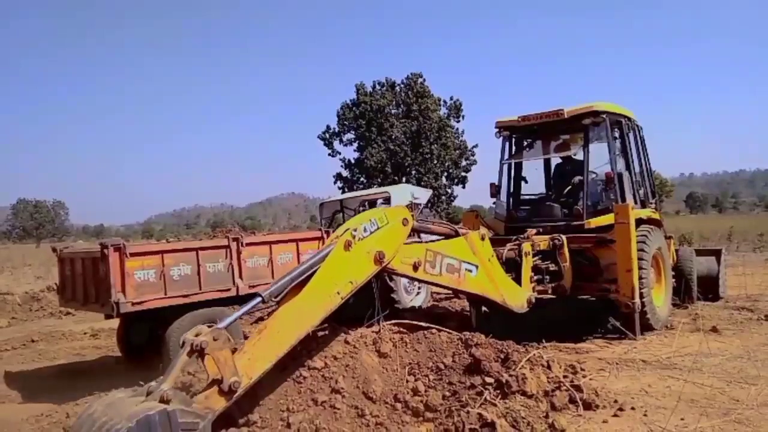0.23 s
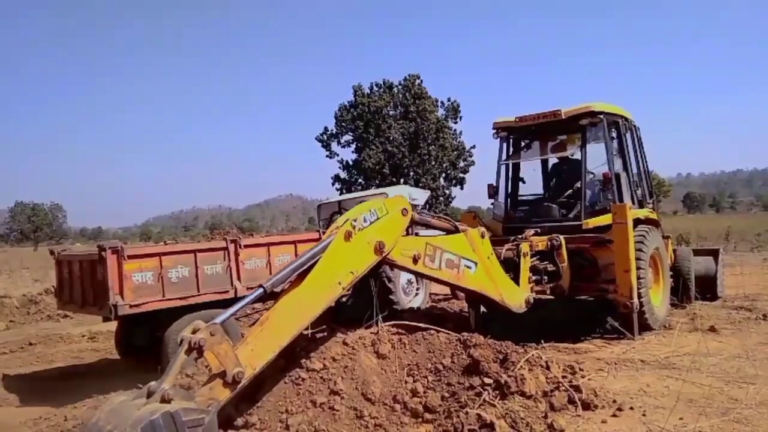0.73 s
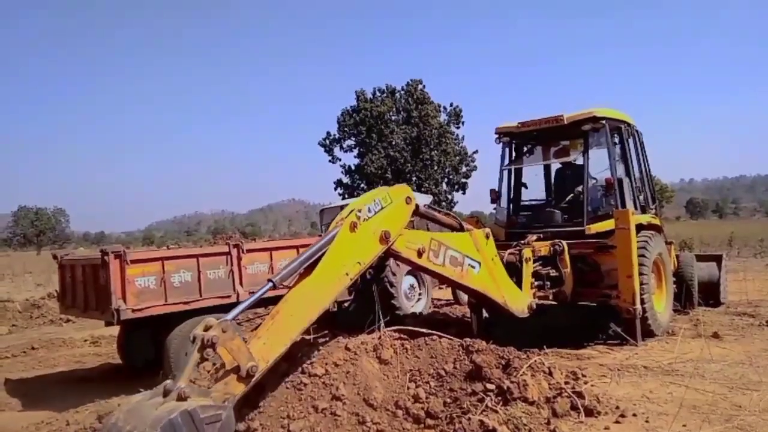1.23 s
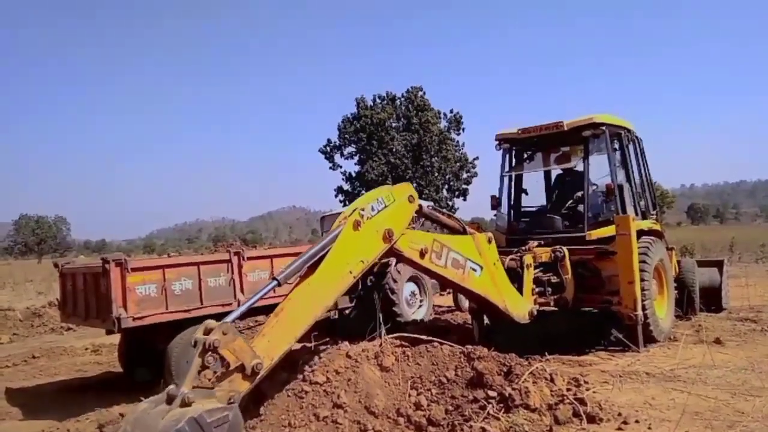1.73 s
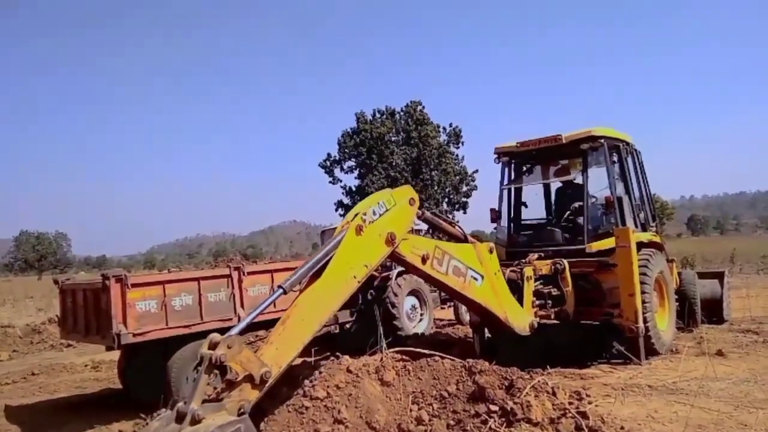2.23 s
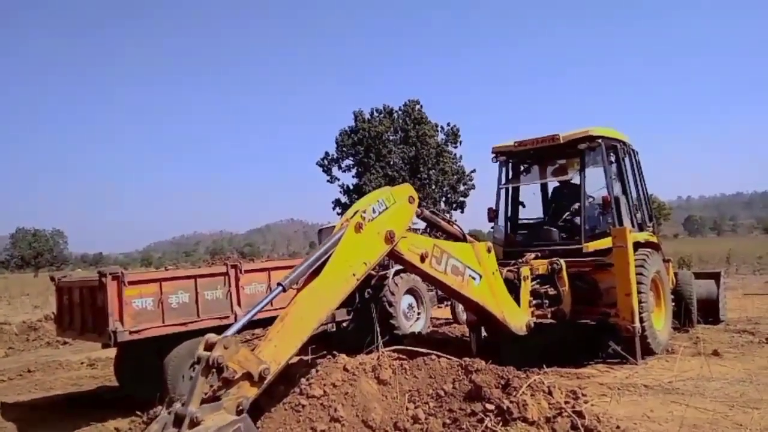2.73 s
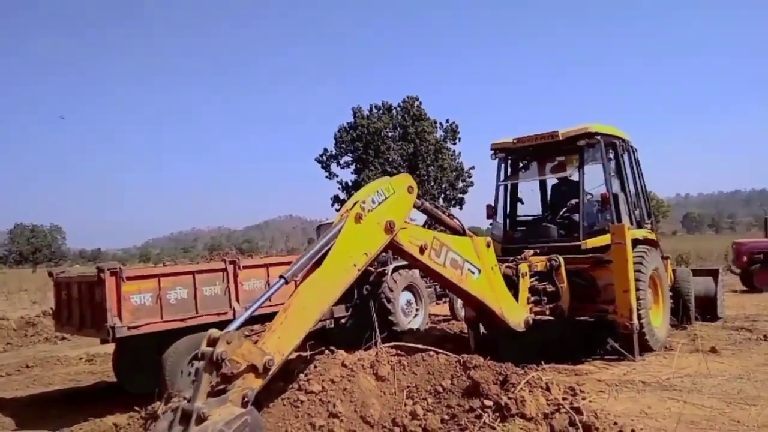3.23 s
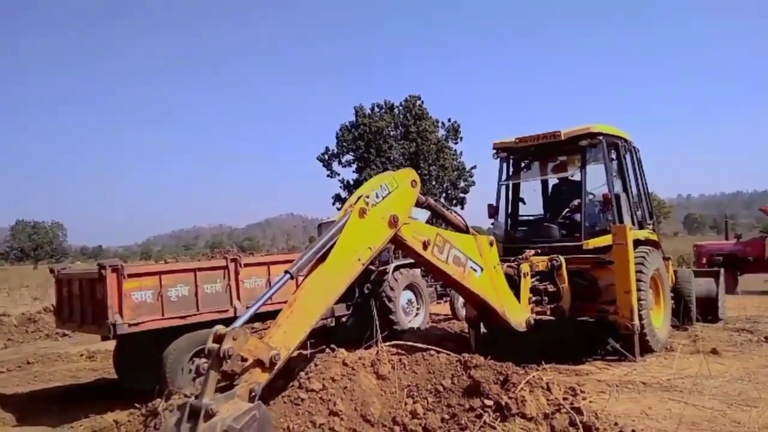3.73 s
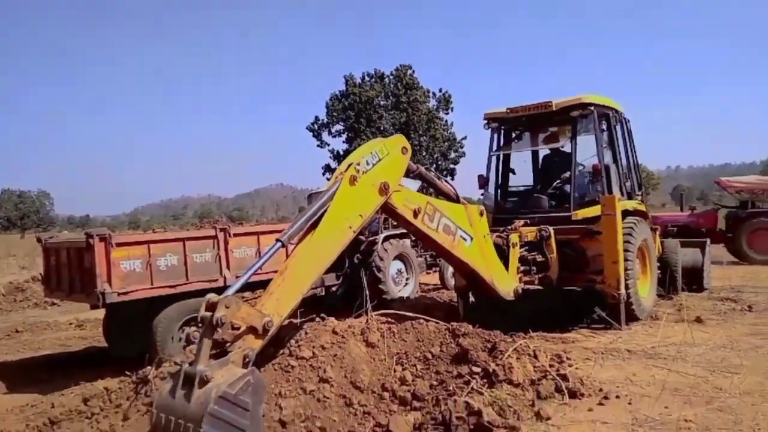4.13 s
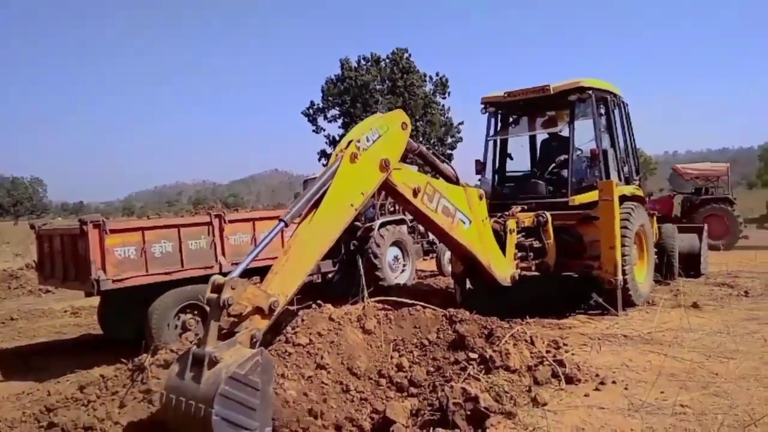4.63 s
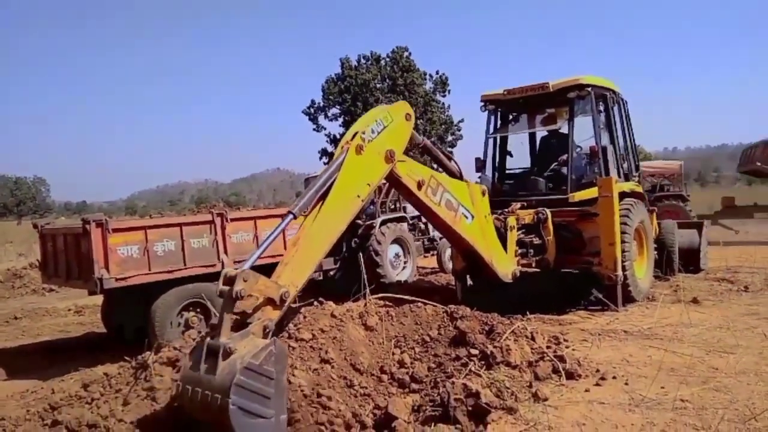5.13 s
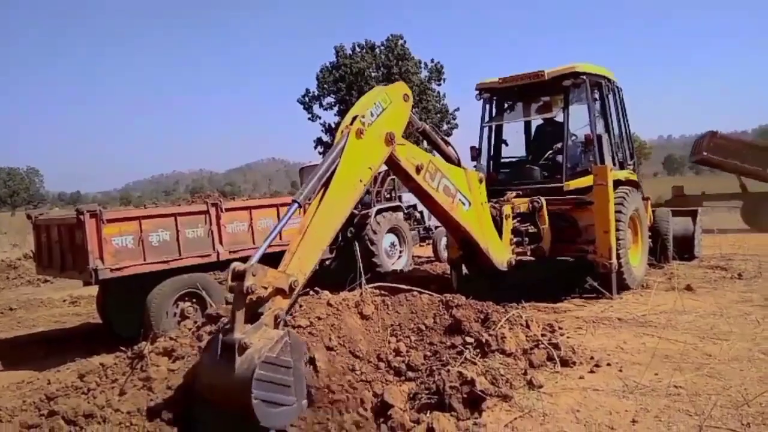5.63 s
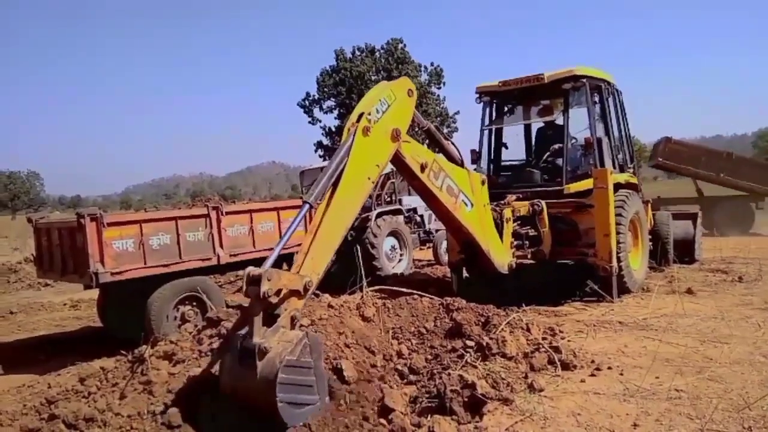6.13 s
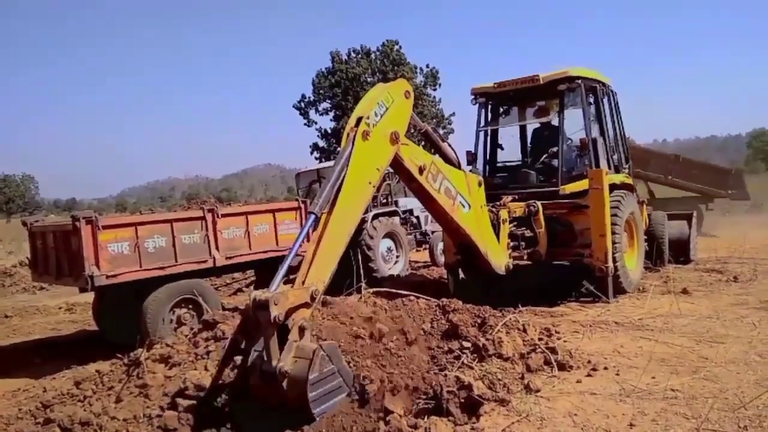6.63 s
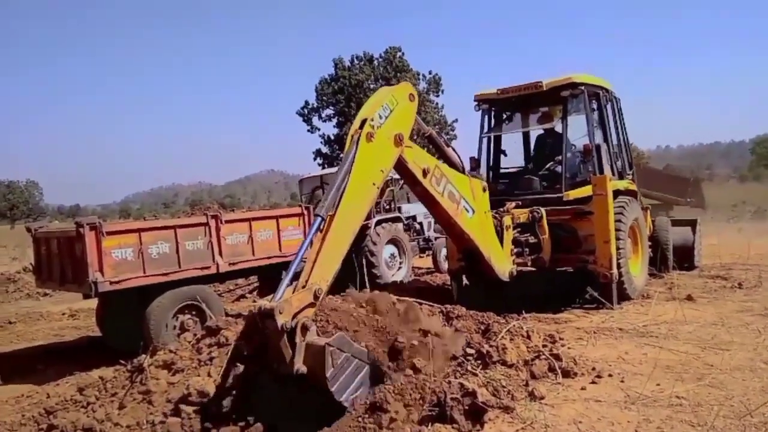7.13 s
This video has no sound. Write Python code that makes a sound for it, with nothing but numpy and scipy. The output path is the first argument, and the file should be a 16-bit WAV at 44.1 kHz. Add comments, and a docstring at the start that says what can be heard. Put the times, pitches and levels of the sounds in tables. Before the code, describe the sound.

A digger's diesel engine throbs steadily as earth grinds and tumbles against its steel bucket, with sharp knocks and dull thuds.

```python
"""A diesel backhoe loader drags its bucket through dry soil in an open field.
Its firings chug in the exhaust and rattle the casing. Earth grinds, slides and thuds; clods and
stones strike the steel bucket, which groans with friction. The linkage clanks, a dry pin squeaks,
the pump hums and oil hisses in the valves. A tractor drones behind. The sound is on the left."""
import sys
import numpy as np
from scipy import signal
from scipy.fft import rfft, irfft, next_fast_len
from scipy.io import wavfile
from scipy.ndimage import uniform_filter1d, map_coordinates

SR = 44100
rng = np.random.default_rng(int(sys.argv[2]) if len(sys.argv) > 2 else 0)


def wav_record(signal):
    """Record a signal, one row per channel, as 16-bit PCM in the file named by sys.argv[1]."""
    frames = np.transpose(np.atleast_2d(signal))
    bounded = np.clip(frames, -1, 1)
    # unit amplitude maps onto the largest positive 16-bit level
    quanta = np.round(bounded * 32767).astype(np.int16)
    wavfile.write(sys.argv[1], SR, quanta)


N = 325017
TIME = np.arange(N) / SR
LN_1000 = np.log(1000)  # 60 dB of decay

# bucket bites, fills, lifts clear: (time [s], scrape level [dB], tumble level [dB])
DIG_LEVELS = [(.25, -56.5, -48), (1.3, -56.5, -84), (1.75, -48, -77), (1.83, -42, -48), (2.05, -42, -39),
              (2.33, -49.5, -43), (2.6, -49, -54), (3.3, -55.5, -48.5), (4.4, -56.5, -51.5),
              (5.5, -70.5, -56.5), (6.0, -62.5, -55), (7.37, -83.5, -59.5)]
# hollow steel bucket: (frequency [Hz], base t60 [s])
BUCKET_MODES = [(385, 0.096), (440, 0.096), (508, 0.17), (545, 0.076), (582, 0.027), (615, 0.15),
                (743, 0.17), (852, 0.0083), (905, 0.069), (982, 0.12)]
# frame and ground: (frequency [Hz], relative density [dB])
GROUND_SPECTRUM = [(20, -21.5), (38, 7), (80, 3.5), (120, 12.5), (190, 0), (290, -1), (380, -10),
                   (480, -50), (700, -32.5), (1500, -62.5)]


def exhaust(firings, load_db):
    """Each firing pushes and pulls exhaust gas, a little unevenly; overtones grow with load."""
    # (multiple of firing rate, relative level [dB])
    overtones = [(2, 6.5), (3, 1)]
    bark = sum(undb(db + 1.8 * walk(14)) * np.sin(2 * np.pi * k * firings) for k, db in overtones)
    tone = np.sin(2 * np.pi * firings) * undb(1.8 * walk(25))
    tone_db = -34.5 + .45 * (load_db - np.median(load_db))
    chug = undb(1.7 * walk(32))
    return -chug * (unit(tone) * undb(tone_db) + unit(bark) * undb(load_db + 8.5))


def clatter(firings, bite_db):
    """Combustion and gears rattle the casing once a firing, harder when the bucket bites."""
    # casing: (frequency [Hz], nominal width [Hz], relative level [dB])
    modes = [(530, 23, -3.5), (744, 66, -8), (880, 34, -19.5), (1209, 176, 6.5), (1800, 243, 2),
             (2543, 200, -3.5), (2728, 200, -4.5), (2960, 170, -6.5), (3170, 100, -12), (3720, 54, -13),
             (4294, 220, -19.5)]
    decay_cycles = .38
    stroke = undb(7 * rng.standard_normal(int(firings[-1]) + 1))[firings.astype(int)]
    gate = 2 + stroke * np.exp(-(firings % 1) / decay_cycles)
    casing = lambda f: sum(undb(db) / (1 + 2j * (f - hz) / (.58 * width)) ** 2 for hz, width, db in modes)
    ring = shape(noise() * gate, casing)
    ring = np.interp(TIME + .00018 * walk(22), TIME, ring)  # slight pitch waver
    force_db = -53 + .4433 * (bite_db - np.median(bite_db))
    return patchy(ring, spread_db=4, rate_hz=15, width_hz=126.15) * undb(force_db + walk(19))


def digging():
    """Scrape, tumble and shudder levels in dB: the steady bite, swollen as earth slides off the bucket."""
    # (peak time [s], level [dB], t60 [s])
    slides = [(.86, -52.5, 1.1), (2.209, -44, 0.27), (3.0, -35.5, 0.63), (6.7, -49.5, 1.1)]
    rise_s = .13
    scrape_db, tumble_db = curves(DIG_LEVELS)
    slide = sum(undb(db) * blow(s - rise_s, rise_s, t60) for s, db, t60 in slides)
    swell = lambda steady_db, share_db: 20 * np.log10(np.hypot(undb(steady_db), undb(share_db) * slide))
    return swell(scrape_db, 0), swell(tumble_db, -4.5), swell(steady_db=-36.5, share_db=14.5)


def soil(scrape_db):
    """Crumbs grind along the steel in uneven slips; a light touch only whispers."""
    # (frequency [Hz], relative density [dB])
    spectrum = [(350, -3), (600, 3), (800, -18.5), (1050, -22.5), (1300, 1.5), (1520, 1), (1850, 1),
                (3000, 0.5), (3900, -12), (5000, -25.5), (6800, -22.5), (9000, -38.5), (15000, -45.5)]
    grind = colour(grains(per_s=3000, spread_db=3.5) + .9 * noise(), spectrum)
    whisper_db = 2.2 * np.minimum(scrape_db + 54, 0)
    slip_db = 1.5 * walk(48)
    grind = patchy(grind, spread_db=7, rate_hz=28, width_hz=185.8)
    return grind * undb(scrape_db + whisper_db + slip_db)


def knocks():
    """Linkage knocks and cracking stones: a snap, then a shower of cracks and a spray of grit."""
    # (time [s], relative crack level [dB], relative grit level [dB], shower t60 [s])
    hits = [(0.515, -44, -50.5, 0.31), (0.806, -51, -54, 0.19), (1.526, -40, -54, 0.81),
            (1.89, -28, -46.5, 1), (2.152, -25.5, -39, 0.25), (2.343, -40.5, -65, 0.24),
            (2.408, -34.5, -51.5, 0.26), (2.461, -33.5, -54.5, 0.34), (2.521, -29.5, -44, 0.12),
            (2.659, -38.5, -41, 0.23), (2.81, -37, -44.5, 0.27), (2.914, -32, -70, 0.39),
            (3.045, -30.5, -56, 0.45), (3.262, -33, -80, 0.4), (3.277, -38, -71, 0.77),
            (3.549, -38, -56.5, 0.61), (3.651, -37, -45, 0.19), (3.674, -37, -56, 0.45),
            (4.05, -40.5, -57.5, 0.35), (4.114, -32, -44, 0.33), (4.426, -38.5, -69, 0.4),
            (5.077, -40.5, -80, 0.19), (5.112, -36.5, -88, 0.28), (6.4553, -31.5, -70, 0.37),
            (6.552, -42, -94, 0.6), (6.634, -38.5, -43.5, 0.27), (6.702, -47, -51, 0.067)]
    # both: (frequency [Hz], relative density [dB])
    crack_spectrum = [(200, -11.5), (500, 20), (750, 10), (1300, 17), (2700, 14.5), (3300, 6), (3900, -22),
                      (4800, -40), (9000, -68.5)]
    grit_spectrum = [(2500, -18), (4000, 9), (5200, -5.5), (7000, -3), (9000, -11.5), (11500, -10),
                     (15000, -22.5)]
    snap = sum(undb(db - 6) * blow(s, .003, .07) for s, db, _, _ in hits)
    shower = sum(undb(db - 8) * blow(s, .009, t60) for s, db, _, t60 in hits)
    spray = sum(undb(db - 4.5) * blow(s - .002, .0082, .96 * t60) for s, _, db, t60 in hits)
    stone = colour(grains(per_s=3500, spread_db=2), crack_spectrum)
    stone = patchy(stone, spread_db=3, rate_hz=12, width_hz=110)
    grit = colour(grains(per_s=2200, spread_db=1), grit_spectrum)
    grit = patchy(grit, spread_db=5, rate_hz=14, width_hz=160)
    return (snap + shower) * stone + spray * grit


def clods():
    """Clods ring the bucket modes near their own pitch; harder ones ring higher and crunch less."""
    # (time [s], relative level [dB], favoured frequency [Hz])
    large = [(.503, -45, 575), (.638, -35, 568), (1.406, -45, 620), (1.84, -39, 660), (1.885, -32.5, 600),
             (2.157, -28, 818), (2.53, -36.5, 770), (2.659, -34.5, 472), (2.84, -35.5, 532),
             (3.06, -29, 463), (3.273, -40, 665), (3.322, -41.5, 890), (3.662, -39, 395), (4.11, -36, 560),
             (4.343, -39, 423), (4.93, -45.5, 537), (5.114, -38.5, 553), (6.457, -44, 940),
             (6.554, -40.5, 564), (6.624, -41.5, 510), (7.197, -42, 540)]
    # (frequency [Hz], relative density [dB])
    crunch_spectrum = [(150, -21.5), (350, 26), (680, -3), (900, -19.5), (1600, -31.5)]
    small_hz, crunch_db_per_octave = 530, -17
    moments = scatter(start_s=2.1, per_s=5.1)  # small clods drop once the bucket is full
    small = [(s, -57 + 1.4 * size, small_hz * 2 ** (.3 * pitch)) for s, size, pitch in moments]
    drops = list(large) + small
    hz, t60 = np.transpose(BUCKET_MODES)[:, :, None]
    t = TIME[:SR // 4]
    decay = np.exp(-LN_1000 * t / (1.65 * t60))
    attack = 1 - np.exp(-t / .0035)
    flutter = 1 + .45 * walk(260)  # loose earth on the ringing steel
    rings, crunch = np.zeros(N + len(t)), np.zeros(N)
    for (s, db, centre_hz), phase in zip(drops, rng.random((len(drops), len(hz), 1))):
        first = int(s * SR)
        weight = favour(hz, centre_hz, span_octaves=.085)
        loaded_hz = hz * (1 + .015 * rng.standard_normal())  # shifting load retunes the bucket
        ring = np.sum(weight * decay * np.sin(2 * np.pi * (loaded_hz * t + phase)), axis=0)
        ring *= attack * flutter[first // 2:][:len(t)]
        rings[first:first + len(t)] += undb(db + 6) * ring / np.abs(ring).max()
        crunch_db = db - 8 + crunch_db_per_octave * np.log2(centre_hz / small_hz)
        crunch += undb(crunch_db) * blow(s, .005, .6)
    return rings[:N] + crunch * colour(noise(), crunch_spectrum)


def thuds():
    """Heavy lumps shake the ground for a few cycles and break up."""
    # (time [s], relative level [dB], frequency [Hz])
    lumps = [(0.534, -24.5, 146), (0.857, -22, 140), (.917, -23.5, 170), (1.652, -27, 191),
             (1.914, -21, 117), (2.238, -25, 200), (2.684, -23.5, 103), (2.938, -16, 109),
             (2.977, -21, 157), (3.019, -18, 206), (3.263, -21.5, 116)]
    swing = sum(undb(db + 6.5) * blow(s, .0038, .042) * np.sin(2 * np.pi * hz * (TIME - s))
                for s, db, hz in lumps)
    crumble = sum(undb(db - 2) * blow(s, .018, .19) for s, db, _ in lumps)
    return swing + crumble * colour(noise(), GROUND_SPECTRUM)


def rumble(firings, shudder_db):
    """Frame and ground shudder, throbbing with each crank turn and each firing."""
    throb = 1 + .29 * np.cos(np.pi * firings) + .5 * np.cos(2 * np.pi * firings)
    return colour(noise() * throb, GROUND_SPECTRUM) * undb(shudder_db)


def clanks():
    """Steel strikes steel or stone; the faces chatter and ring the linkage modes around one pitch."""
    # arm and linkage: (frequency [Hz], t60 [s])
    modes = [(1244, 0.16), (1650, 0.26), (1815, 0.31), (2245, 0.092), (2495, 0.086), (2720, 0.041),
             (3101, 0.056), (3278, 0.12)]
    # (time [s], relative level [dB], favoured frequency [Hz])
    hits = [(1.807, -29.5, 1720), (1.884, -23.5, 3200), (2.159, -21.5, 2760), (2.519, -23, 2600),
            (2.527, -41, 1250), (4.117, -38, 2300), (4.137, -35.5, 1540), (5.078, -36.5, 1850)]
    chatter_s, dull_hz = .0045, 3600  # earth between the faces dulls the blow
    hz, t60 = np.transpose(modes)[:, :, None]
    t = TIME[:SR // 3]
    decay = np.exp(-LN_1000 * t / t60)
    out = np.zeros(N + len(t))
    for s, db, centre_hz in hits:
        first = int(s * SR)
        weight = favour(hz, centre_hz, span_octaves=.2)
        detune = 1 + .008 * rng.standard_normal(hz.shape)
        response = np.sum(weight * decay * np.sin(2 * np.pi * hz * detune * t), axis=0)
        chatter = rng.standard_normal(len(t)) * t * np.exp(-t / chatter_s)
        ring = signal.fftconvolve(response, chatter)[:len(t)]
        out[first:first + len(t)] += undb(db - 2) * ring / np.abs(ring).max()
    return signal.sosfilt(signal.butter(6, dull_hz, fs=SR, output="sos"), out[:N])


def groans():
    """Friction makes the dragged bucket sing: a rough tone that swells, glides and fades."""
    # (time [s], length [s], level [dB], start frequency [Hz], end frequency [Hz])
    glides = [(0.218, 0.22, -49, 590, 705), (0.504, 0.074, -41.5, 544, 680), (0.616, 0.12, -35, 311, 306),
              (0.649, 0.12, -48.5, 575, 600), (1.644, 0.1, -46.5, 714, 744), (1.831, 0.08, -37.5, 305, 268),
              (1.926, 0.143, -42.5, 1340, 1270), (2.161, .08, -38, 703, 868), (2.527, 0.051, -32, 811, 759),
              (3.844, 0.051, -40, 502, 554), (3.872, 0.041, -45.5, 886, 938), (4.13, 0.092, -39, 555, 510),
              (4.345, 0.089, -39.5, 471.5, 579), (4.847, 0.079, -53.5, 883, 930)]
    roughness, flutter_hz = .55, 110
    flutter = 1 + roughness * (walk(flutter_hz) + 1j * walk(flutter_hz))
    out = np.zeros(N)
    for s, length_s, db, start_hz, end_hz in glides:
        span = slice(int(s * SR), int((s + length_s) * SR))
        along = np.linspace(0, 1, len(out[span]))
        cycles = np.cumsum(start_hz + (end_hz - start_hz) * along) / SR
        swell = np.sqrt(np.abs(np.sin(np.pi * along)))
        out[span] += undb(db) * swell * np.imag(flutter[span] * np.exp(2j * np.pi * cycles))
    return out


def tumbling(tumble_db):
    """Small clods keep tumbling in the bucket and make its lower modes mutter."""
    # (frequency [Hz], relative gain [dB])
    tilt = [(200, -31), (370, 4.5), (600, 1), (720, -17.5), (950, -2.5), (1400, -40)]
    taps = grains(per_s=400, spread_db=0) * undb(2 * walk(20))
    bucket = lambda f: sum(1 / (1 + 2j * np.pi * (f - hz) * t60 / LN_1000) for hz, t60 in BUCKET_MODES)
    ring = colour(shape(taps, bucket), tilt)
    return patchy(ring, spread_db=8, rate_hz=17, width_hz=100) * undb(tumble_db)


def pump(firings):
    """The hydraulic pump, geared to the crank, hums at six times the firing rate."""
    hum = np.sin(2 * np.pi * 6 * firings + .3 * walk(45)) * undb(3 * walk(7.7))
    return unit(hum) * undb(-47.5)


def oil_flow(scrape_db):
    """Oil level in dB: each valve opens, holds and shuts, over a leak that follows the scrape."""
    # (time [s], hold [s], level [dB])
    openings = [(0.97, 0.4, -68.5), (1.9, 0.12, -56), (2.82, 0.18, -59), (3.639, 0.25, -60.5),
                (4.35, 0.13, -62.5), (4.981, 0.13, -67.5)]
    open_db_per_s, shut_db_per_s, leak_db = 318, 237, -19
    flow = undb(scrape_db + leak_db)
    for s, hold_s, db in openings:
        opening_db = np.maximum(s - TIME, 0) * open_db_per_s
        shutting_db = np.maximum(TIME - s - hold_s, 0) * shut_db_per_s
        flow = np.hypot(flow, undb(db - opening_db - shutting_db))
    return 20 * np.log10(flow)


def valves(flow_db):
    """Throttled oil hisses and flutters; the harder it is forced, the higher the hiss."""
    # both: (frequency [Hz], relative density [dB])
    hiss_spectrum = [(4000, -39), (5500, -15.5), (7000, 0), (8500, -10), (10600, 5), (12500, -4),
                     (14200, -6.5), (15500, -13)]
    jet_spectrum = [(7000, -36.5), (11000, 2), (13000, 12), (15500, 5)]
    force = np.clip((flow_db + 80.5) / 20, 0, 1)
    jet = colour(noise(), jet_spectrum)
    hiss = colour(noise(), hiss_spectrum) * (1 - .5 * force) + .91 * force * jet
    return patchy(hiss, spread_db=6, rate_hz=7, width_hz=170) * undb(flow_db - 2 + 4.14 * walk(50))


def squeaks():
    """A dry pin sticks and slips; each slip gives a gritty tick and a rough, high chirp."""
    # (time [s], length [s], relative chirp level [dB], frequency [Hz], tick level [dB])
    bouts = [(0.926, .05, -64, 10400, -63), (0.995, .12, -54, 10600, -53.5), (1.176, .09, -63, 10540, -63),
             (1.282, .05, -63, 10600, -53.5), (5.303, .02, -62, 4350, -82), (5.643, .02, -53, 3330, -77),
             (6.606, .02, -50, 14240, -61)]
    # (frequency [Hz], relative density [dB])
    tick_spectrum = [(3500, -9.5), (7000, -2.5), (8500, -9), (10600, 8), (12500, -20), (14200, -12),
                     (15500, -18)]
    period_s = .0345
    slips = [(s, db, hz, tick_db) for start_s, length_s, db, hz, tick_db in bouts
             for s in np.arange(start_s, start_s + length_s, period_s)]
    jitter_s = .002 * rng.standard_normal(64)
    chirps, ticks = np.zeros((2, N))
    for (s, db, hz, tick_db), late_s in zip(slips, jitter_s):
        envelope = blow(s + late_s, rise_s=.008, t60_s=.075)
        chirps += undb(db + 3) * envelope * np.cos(2 * np.pi * hz * TIME)
        ticks += undb(tick_db) * envelope
    chirps *= walk(1100)
    grit = patchy(colour(noise(), tick_spectrum), spread_db=4, rate_hz=25, width_hz=300)
    return chirps + ticks * grit


def tractor():
    """A second diesel drones further off; one tone beats against the exhaust's third harmonic."""
    # (frequency [Hz], relative level [dB])
    tones = [(68, -40), (247, -46.5)]
    beat_hz = 148.5
    sine = lambda hz: np.sin(2 * np.pi * np.cumsum(hz) / SR)
    drone = sum(undb(db + 2.5 * walk(39)) * sine(hz * (1 + .00589 * walk(1.9))) for hz, db in tones)
    drone += undb(-41) * sine(beat_hz + walk(1.989))
    swell_db = np.interp(TIME, [0, 3.5], [-3, 2])
    return drone * undb(swell_db)


def undb(db):
    """Decibels to gain."""
    return 10 ** (np.asarray(db) / 20)


def unit(x):
    """Scale to rms 1."""
    return x / np.sqrt(np.mean(x ** 2))


def curves(table):
    """One per-sample control for each column after the time."""
    s, *columns = np.transpose(table)
    return [np.interp(TIME, s, column) for column in columns]


def shape(x, gain):
    """Filter by gain(Hz); rms 1."""
    size = next_fast_len(N)
    hz = np.maximum(np.arange(size // 2 + 1) * SR / size, 1)
    return unit(irfft(rfft(x, size) * gain(hz), size)[:N])


def colour(x, spectrum):
    """Filter by (frequency [Hz], gain [dB]) points; rms 1."""
    hz, db = np.transpose(spectrum)
    return shape(x, lambda f: undb(np.interp(np.log(f), np.log(hz), db)))


def favour(hz, centre_hz, span_octaves):
    """Mode weights: 1 at the centre, half at one span away."""
    return 1 / (1 + (np.log2(hz / centre_hz) / span_octaves) ** 2)


def patchy(x, spread_db, rate_hz, width_hz):
    """Each band swells and fades at random, within limits; rms 1."""
    hz, s, spectrum = signal.stft(x, SR, nperseg=1024)
    chance = rng.standard_normal((400, 400))
    grid = np.meshgrid(hz / width_hz, s * rate_hz, indexing="ij")
    drift = map_coordinates(chance, grid, order=1, mode="wrap")
    gain = undb(spread_db * unit(np.tanh(2 * drift)))
    return unit(signal.istft(spectrum * gain, SR)[1][:N])


def noise():
    """White noise."""
    return rng.standard_normal(N)


def walk(rate_hz):
    """Smooth random drift; rms 1."""
    hold = int(SR / rate_hz)
    steps = np.repeat(rng.standard_normal(N // hold + 1), hold)
    return unit(uniform_filter1d(uniform_filter1d(steps, hold), hold)[:N])


def grains(per_s, spread_db):
    """Random clicks, most small and a few large; rms 1."""
    clicks = (rng.random(N) < per_s / SR) * noise()
    return unit(clicks * undb(spread_db * np.minimum(rng.exponential(size=N), 4)))


def scatter(start_s, per_s):
    """Loosely spaced moments: (time [s], random value, random value)."""
    slots = np.arange(start_s, TIME[-1] - 1 / per_s, 1 / per_s)
    chance = rng.standard_normal((200, 3))[:len(slots)]
    return np.column_stack([slots + (1 + np.tanh(chance[:, 0])) / (2 * per_s), chance[:, 1:]])


def blow(start_s, rise_s, t60_s):
    """Impact envelope: linear rise, exponential fall; peak 1."""
    envelope = np.zeros(N)
    first = int(start_s * SR)
    t = TIME[:min(SR, N - first)]
    fall = np.exp(-LN_1000 * np.maximum(t - rise_s, 0) / max(t60_s, .01))
    envelope[first:first + len(t)] = np.minimum(t / rise_s, 1) * fall
    return envelope


def scene():
    """Backhoe, earth and tractor in the open."""
    # four-cylinder diesel: (time [s], firing rate [Hz])
    speed = [(.25, 51), (2.0, 49.3), (2.5, 47.3), (3.8, 47.2), (4.6, 47.7), (5.1, 47.2), (5.5, 48.1),
             (6.3, 47.4), (6.7, 48.1)]
    # engine load: (time [s], relative exhaust level [dB])
    load = [(.25, -54.5), (1.0, -47.5), (2.0, -42), (2.5, -41), (3.0, -32), (3.8, -38), (4.8, -37),
            (5.6, -39), (6.2, -38.5), (6.75, -38), (6.98, -51), (7.3, -38)]
    firing_hz, = curves(speed)
    load_db, = curves(load)
    bite_db, _ = curves(DIG_LEVELS)
    scrape_db, tumble_db, shudder_db = digging()
    firings = np.cumsum(firing_hz * (1 + .0043 * walk(20))) / SR
    machine = exhaust(firings, load_db) + pump(firings) + clatter(firings, bite_db)
    machine += valves(oil_flow(scrape_db)) + squeaks() + clanks() + groans()
    earth = rumble(firings, shudder_db) + soil(scrape_db) + tumbling(tumble_db)
    earth += knocks() + thuds() + clods()
    return (machine + earth + tractor()) * undb([[6], [-50]])  # right: only a faint copy of the scene


def record(dry):
    """The level fades up in two steps; the top is cut."""
    # (time [s], gain [dB])
    fade_in = [(.115, -90), (.122, -23), (.205, -17), (.24, -1)]
    top_hz = 15500
    fade_db, = curves(fade_in)
    return signal.sosfilt(signal.ellip(8, .2, 70, top_hz, fs=SR, output="sos"), dry * undb(fade_db))


dry = scene()
out = record(dry)
wav_record(out)
```